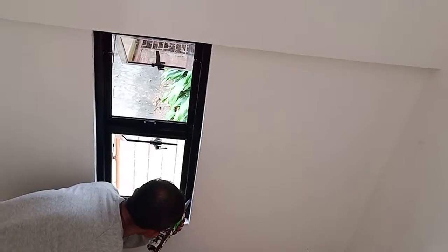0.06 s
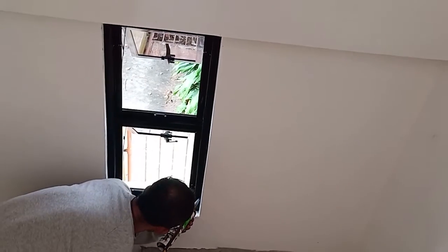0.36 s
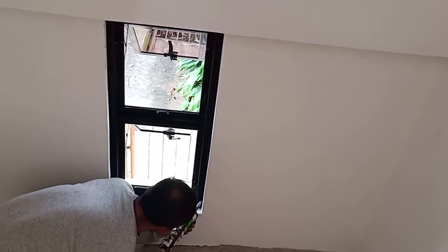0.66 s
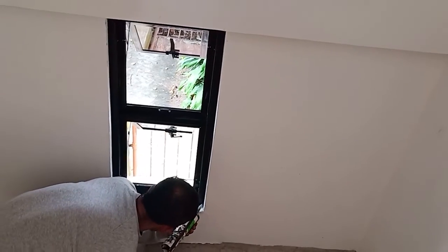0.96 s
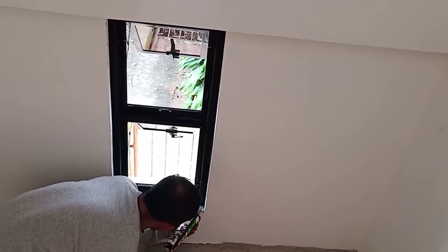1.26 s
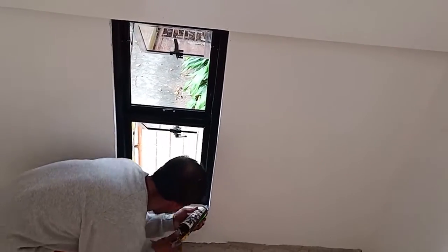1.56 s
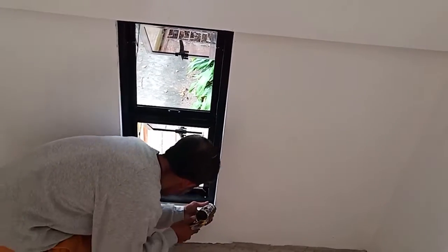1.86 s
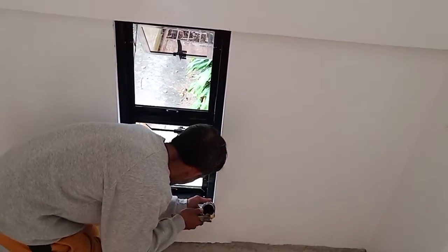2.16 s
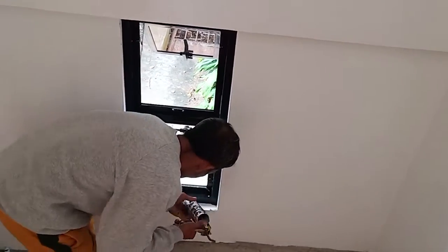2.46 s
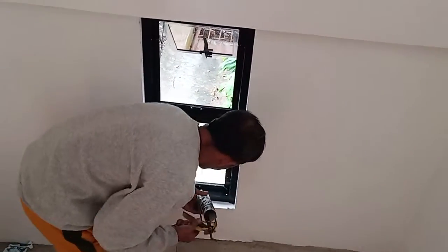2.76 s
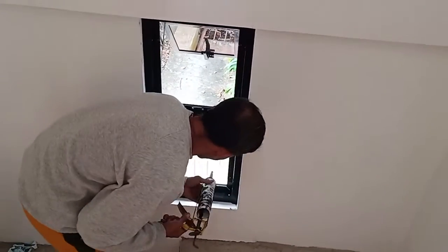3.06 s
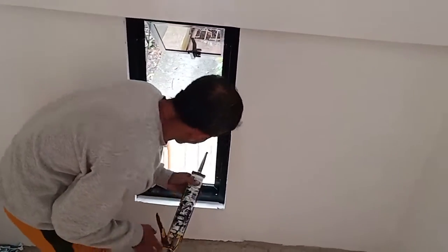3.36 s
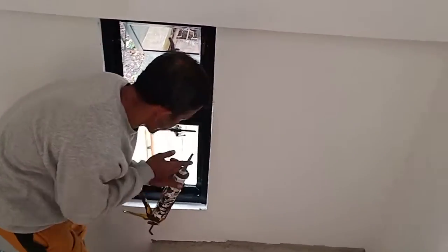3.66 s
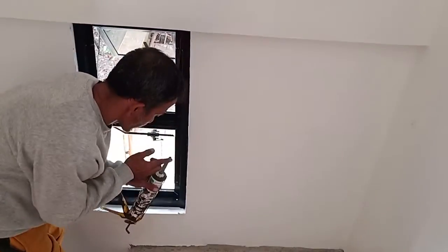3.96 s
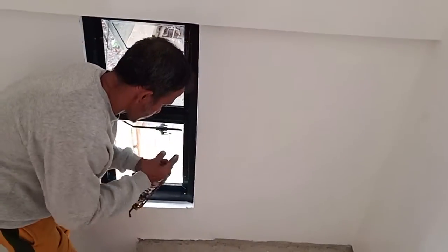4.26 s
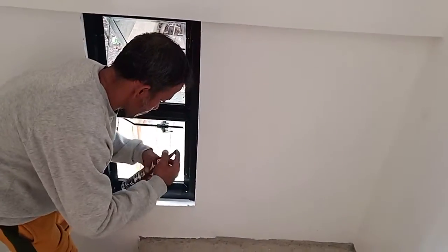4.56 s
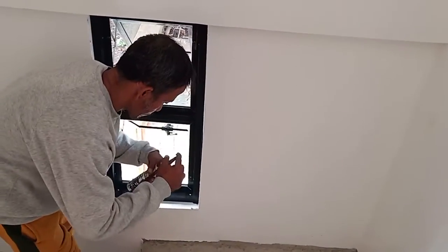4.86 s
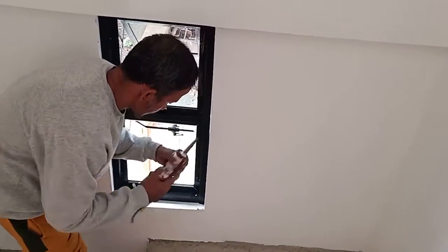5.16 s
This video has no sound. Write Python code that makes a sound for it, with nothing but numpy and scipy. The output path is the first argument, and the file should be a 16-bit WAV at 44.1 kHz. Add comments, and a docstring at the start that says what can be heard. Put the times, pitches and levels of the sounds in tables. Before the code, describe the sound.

A caulking gun's nozzle drags softly and grittily along a window frame, stopping by 0.5 seconds, over low scuffs of a shifting body. At about 0.6 seconds something heavy bangs and rattles further off, echoing through the bare room. From 1.4 to 1.8 seconds the steel gun clicks and clacks, followed by a short rod scrape and a low, wavering hoot. The window frame gives a hollow knock at 2.3 seconds, and a finger bumps the phone microphone just after. Brief scrapes and a fainter hoot begin around 2.7 seconds, then the sharpest ringing clacks come between 2.8 and 3.2 seconds. Faint, thin whistles drift through the quiet from 3.4 seconds, with a bright tick on the plastic nozzle at 4.3. At about 5 seconds heavy things clatter loudly further away, ringing in the room. The background stays very quiet.

```python
"""A gritty drag slows to a stop: a steel caulking gun's nozzle on a window frame in a bare, echoing room.
Its catch plate, trigger and plunger rod clack, ring and scrape; the frame knocks, the nozzle ticks.
Heavy bangs and a last loud clatter come from further off. Each contact is a burst of micro-slips.
A shifting body scuffs and fingers bump the phone; two wavering hoots and a few thin whistles
drift in over a very quiet floor."""
import sys
import numpy as np
from scipy import signal
from scipy.fft import rfft, irfft
from scipy.io import wavfile
from scipy.ndimage import uniform_filter1d

SR = 44100
rng = np.random.default_rng(int(sys.argv[2]) if len(sys.argv) > 2 else 0)


def int16_out(signal):
    """Quantize to a 16-bit WAV file."""
    q = np.round(np.clip(np.atleast_2d(signal).T, -1, 1) * 32767)
    wavfile.write(sys.argv[1], SR, q.astype(np.int16))


N = 230422
T = np.arange(N) / SR
HIT_SAMPLES, LEAD_SAMPLES = 8192, 256

# Noise floor spectrum. Each row: frequency in Hz, relative level in dB.
FLOOR_COLOUR = [(25, -21), (60, -5), (150, 2.5), (300, -0.5), (600, -6.5), (1200, -10), (2500, -12),
                (6000, -20.5), (15500, -24)]


def undb(db):
    """Decibels to gain."""
    return np.exp(np.asarray(db) * np.log(10) / 20)


def unit(x):
    """Scale to rms 1."""
    return x / np.sqrt(np.mean(x ** 2))


def along(points, hz):
    """Interpolate (Hz, value) points on a log-frequency axis."""
    point_hz, value = np.transpose(points)
    return np.interp(np.log(hz + 1), np.log(point_hz), value)


def bins(size):
    """Frequencies of a real spectrum in Hz."""
    return np.fft.rfftfreq(size, 1 / SR)


def noise(colour):
    """Steady coloured noise, rms 1."""
    size = 2 ** 18
    white = rfft(rng.standard_normal(size))
    return unit(irfft(white * undb(along(colour, bins(size))))[:N])


def body(colour, tilt_db_per_octave):
    """Minimum-phase response of a struck object; harder contact tilts it toward the treble."""
    hz = bins(HIT_SAMPLES)
    octaves = np.log2(np.maximum(hz, 300) / 1000)
    gain = undb(along(colour, hz) + tilt_db_per_octave * octaves)
    cepstrum = irfft(np.log(unit(gain)))
    cepstrum[1:HIT_SAMPLES // 2] *= 2
    cepstrum[HIT_SAMPLES // 2 + 1:] = 0
    return np.exp(rfft(cepstrum))


def ring(modes):
    """Summed response of damped resonances."""
    hz = bins(HIT_SAMPLES)
    return sum(undb(db) * 1j * hz * width_hz / (mode_hz ** 2 - hz ** 2 + 1j * hz * width_hz)
               for mode_hz, width_hz, db in modes)


def add_contact(track, start_s, length_s, db, response, grain_db):
    """A short run of uneven micro-slips excites a body."""
    size, grain = rng.standard_normal((2, HIT_SAMPLES))
    progress = np.maximum(np.arange(HIT_SAMPLES) - LEAD_SAMPLES, 0) / SR / max(length_s, 0.0005)
    envelope = np.sqrt(progress) * np.exp(-progress ** 4)
    slips = rfft(size * undb(grain_db * grain) * envelope)
    # whiten: all colour comes from the body
    slips /= np.sqrt(uniform_filter1d(np.abs(slips) ** 2, size=31, mode="mirror"))
    force = irfft(slips) * (progress > 0) * np.sqrt(length_s * SR)
    first = int(start_s * SR) - LEAD_SAMPLES
    track[first:first + HIT_SAMPLES] += undb(db) * irfft(rfft(force) * response)[:N - first]


def strike(contacts, colour, grain_db, modes=()):
    """A series of contacts on one object."""
    out = np.zeros(N)
    resonance = 1 + ring(modes)
    for start_s, length_s, db, tilt in contacts:
        add_contact(out, start_s, length_s, db, body(colour, tilt) * resonance, grain_db)
    return out


def tone(note, attack_s, release_s, waver, width_hz):
    """A gliding sine whose level and phase waver as its reflections mix."""
    start_s, length_s, hz, glide_hz_per_s, db, fade_db_per_s = note
    age_s = np.clip(T - start_s, 0, length_s)
    in_phase, quadrature = (waver * np.interp(age_s * width_hz, np.arange(256), knots)
                            for knots in rng.standard_normal((2, 256)))
    phase = 2 * np.pi * (hz + glide_hz_per_s * age_s / 2) * age_s
    gate = np.clip(np.minimum(age_s / attack_s, (length_s - age_s) / release_s), 0, 1)
    level = gate * undb(db - fade_db_per_s * age_s) * np.sqrt(2 / (1 + waver ** 2))
    return level * ((1 + in_phase) * np.sin(phase) + quadrature * np.cos(phase))


def room(x, direct_db, echo_db, t60_scale, build_s):
    """Direct sound plus a dense echo off plaster; the top treble dies first."""
    # Each row: band in Hz, unscaled T60 in seconds, echo level in dB.
    echo_bands = [(100, 0.79, 2.5), (256, .7, 2.5), (547, 0.99, 2), (1340, 0.96, 6), (2870, 0.92, 3.5),
                  (6300, 0.86, 3.5), (10300, 0.64, 1.5), (14630, .57, 4)]
    hz, t60_s, db = np.transpose(echo_bands)
    t = T[:49152]
    band = along(np.c_[hz, np.arange(len(hz))], bins(len(t)))
    white, tail = rfft(rng.standard_normal(len(t))), 0
    for k in range(len(hz)):
        share = np.maximum(1 - np.abs(band - k), 0)
        tail += irfft(white * share) * undb(db[k] - 60 * t / (t60_s[k] * t60_scale))
    tail *= (1 - np.exp(-t / build_s)) / np.sqrt(SR / 20)
    return undb(direct_db) * x + undb(echo_db) * signal.fftconvolve(x, tail)[:N]


def nozzle_drag():
    """The nozzle grinds along the frame to a stop; level follows a power of its speed."""
    # Each row: frequency in Hz, level in dB.
    colour = [(59, -49), (100, -21), (293, 5), (601, -3.5), (727, -10.5), (879, -3.5), (956, -21.5),
              (1060, -8.5), (1550, -10.5), (2690, -6.5), (6000, -9), (9950, -18.5), (15500, -21)]
    level_db, grit_db, stop_s = -42, 3, 0.46
    grit = undb(grit_db * np.repeat(rng.standard_normal(N // 128 + 1), 128)[:N])
    speed = np.maximum(1 - (T / stop_s) ** 2, 0)
    drag = unit(noise(colour) * grit) * undb(level_db) * speed ** 1.77
    return room(drag, direct_db=-1, echo_db=-3.5, t60_scale=1, build_s=0.0089)


def body_scuffs():
    """Low scuffs swell, hold and die away as the body shifts."""
    # Each row: start in seconds, length in seconds, level in dB.
    scuffs = [(0, 0.096, -47.5), (0.18, .11, -49.5), (0.285, 0.04, -45), (0.409, 0.08, -48.5),
              (1.676, .16, -48.5), (2.3, 0.091, -49.5), (2.505, 0.17, -55), (3.27, 0.07, -68)]
    # Each row: frequency in Hz, level in dB.
    colour = [(40, -37.5), (110, -9.5), (180, 6), (300, -0.5), (440, 1.5), (650, -13), (1500, -48)]
    attack_s, release_db_per_s = 0.026, 193.5
    effort = np.zeros(N)
    for start_s, length_s, db in scuffs:
        rise = np.clip((T - start_s) / attack_s, 0, 1)
        effort += rise * undb(db - release_db_per_s * np.maximum(T - start_s - length_s, 0))
    return noise(colour) * effort


def far_bang():
    """Something heavy bangs and rattles further off: dull, mostly echo."""
    # Each row: start in seconds, length in seconds, level in dB, tilt in dB/octave.
    contacts = [(0.552, 0.014, -35.5, -0.5), (.566, 0.014, -21.5, 0.66), (.598, 0.022, -24.5, 0.5),
                (0.649, 0.027, -30, -0.5), (0.751, 0.012, -29.5, -2.5), (0.881, 0.032, -46, -2.5)]
    # Each row: frequency in Hz, level in dB.
    colour = [(40, -45.5), (130, -19), (290, -2), (580, 4), (950, -7.5), (1200, -3.5), (1450, -12.5),
              (2300, -6), (4300, -19.5), (6700, -18.5), (10000, -34), (13000, -29.5), (16000, -30)]
    # Each row: resonance in Hz, width in Hz, gain in dB.
    modes = [(310, 22, 2.5), (541.7, 20, 3), (715, 15, -0.5), (820, 37, 3), (1235, 25, 0.5),
             (1357, 25, 2.5), (2090, 40, 1.5)]
    bang = strike(contacts, colour, grain_db=2.5, modes=modes)
    return room(bang, direct_db=-8.5, echo_db=-5, t60_scale=0.85, build_s=0.002)


def frame_knocks():
    """Dull, hollow contacts with the window frame."""
    # Each row: start in seconds, length in seconds, level in dB, tilt in dB/octave.
    contacts = [(1.030, 0.06, -57, -8), (2.294, 0.019, -34.5, -0.5), (2.335, 0.028, -48, 3),
                (3.288, 0.032, -55.5, -2), (3.621, 0.029, -55, 4)]
    # Each row: frequency in Hz, level in dB.
    colour = [(60, -23), (170, -3), (500, 1), (1100, -6.5), (2600, -0.5), (5000, -11), (9000, -14),
              (15000, -23.5)]
    # Each row: resonance in Hz, width in Hz, gain in dB.
    modes = [(380, 16, 3.5), (525, 37, 15.5), (572, 18, 12.5), (846, 43, 10.5)]
    knocks = strike(contacts, colour, grain_db=6, modes=modes)
    return room(knocks, direct_db=-10, echo_db=-2.5, t60_scale=0.68, build_s=0.00087)


def whistles():
    """Thin, fluttering squeaks and whistles drift in and echo."""
    # Each row: start and length in seconds, pitch in Hz, glide in Hz/s, level in dB, fade in dB/s.
    notes = [(1.404, 0.051, 1880, 0, -59.5, 22), (3.44, 0.57, 1172, -170, -62.5, 22.5),
             (3.615, 0.081, 610, 154, -59, 15), (3.999, 0.18, 760, 256, -76, 15),
             (4.28, 0.19, 1631, 0, -74, 35), (4.408, 0.26, 4670, -1000, -69, 8),
             (4.657, 0.341, 613, 58, -78.5, -44), (4.72, 0.2, 7020, -6500, -76.5, 35)]
    thin = sum(tone(note, attack_s=0.019, release_s=0.035, waver=3.1, width_hz=note[2] / 15)
               for note in notes)
    return room(thin, direct_db=0.5, echo_db=-6, t60_scale=0.64, build_s=0.0025)


def gun_clacks():
    """The catch plate chatters on the rod; each kind of blow rings the parts in its own proportions."""
    # Each row: start in seconds, length in seconds, level in dB, tilt in dB/octave, kind of blow.
    clacks = [(1.443, 0.011, -42.5, -1.5, "catch"), (1.451, 0.0044, -35, -1, "catch"),
              (1.547, 0.013, -49, -4.5, "slide"), (1.625, 0.14, -46, -3, "slide"),
              (1.655, 0.0088, -22.5, 3.5, "seat"), (1.665, 0.013, -16, 2, "seat"),
              (1.744, 0.054, -34, -0.5, "seat"), (2.831, 0.015, -14.5, 3.5, "squeeze"),
              (2.843, 0.0055, -15, 3.5, "squeeze"), (2.854, .003, -18.5, 5.5, "squeeze"),
              (2.942, 0.016, -26, -0.5, "squeeze"), (3.02, 0.016, -19.5, 3.5, "release"),
              (3.029, 0.0068, -10.5, 5, "release"), (3.111, 0.013, -25.5, 0.5, "release"),
              (3.142, 0.0086, -25, 0, "release"), (3.343, 0.016, -40, -1, "release"),
              (3.561, 0.054, -55.5, -2.5, "release")]
    # Steel on steel. Each row: frequency in Hz, level in dB.
    colour = [(60, -39), (150, -25.5), (400, -19.5), (850, -19), (1300, -13), (2400, -3.5), (4500, -2.5),
              (6000, 2.5), (8500, -2.5), (11000, 0), (14000, 0.5), (16000, -3.5)]
    # Ringing parts. Each row: resonance in Hz, width in Hz, gain in dB.
    catch_plate = [(1970, 200, -9), (2490, 140, -2), (3500, 200, 4), (4320, 260, -5.5), (5440, 200, -1),
                   (6270, 220, 1.5), (6650, 250, 2.5)]
    trigger = [(2890, 59, 3), (3018, 430, 5), (3405, 50, 0), (3960, 75, -3)]
    rod = [(5530, 76, -8), (6100, 110, -4), (6630, 150, -0.5), (6840, 240, 3.5), (6830, 150, -5.5)]
    gun_frame = [(1230, 70, 7.5), (1370, 31, -1.5), (2000, 190, -6), (2450, 140, 0.5), (2670, 80, 3),
                 (2820, 40, -0.5), (4288, 160, -3.5), (5900, 120, -5)]
    cartridge = [(110, 54, 20), (190, 80, -0.5), (454.8, 150, 17.5), (708, 50, 7), (990, 400, -6)]
    cradle = [(2216, 30, 0.5), (3300, 15, 0.5), (4740, 27, 4.5), (7300, 35, 0), (8370, 70, 1),
              (9500, 40, -1), (9700, 70, 0), (11750, 90, 0.5), (13600, 70, 0.5), (14600, 70, 1),
              (15200, 110, -1)]
    # Each kind of blow: gains in dB of catch plate, trigger, rod, gun frame, cartridge.
    part_gains_db = {"catch": (16, 2, -1, 0, -36.5), "slide": (-7, -11.5, -12, 15, -13.5),
                     "seat": (-15.5, -30.5, -8, -8, 4), "squeeze": (-15, -6, 2.5, -8.5, -4.5),
                     "release": (-22.5, 4.5, 3.5, -18, -7)}
    parts = [ring(modes) for modes in (catch_plate, trigger, rod, gun_frame, cartridge)]
    cradle_ring = undb(-1.5) * ring(cradle)  # same for every blow
    out = np.zeros(N)
    for start_s, length_s, db, tilt, blow in clacks:
        parts_ring = sum(undb(gain_db) * part for gain_db, part in zip(part_gains_db[blow], parts))
        response = body(colour, tilt) * (1 + cradle_ring + parts_ring)
        add_contact(out, start_s, length_s, db, response, grain_db=-1.5)
    return room(out, direct_db=-3.5, echo_db=-4, t60_scale=0.96, build_s=0.0065)


def rod_rasps():
    """The plunger rod scrapes briefly through its guide."""
    # Each row: start in seconds, length in seconds, level in dB, tilt in dB/octave.
    contacts = [(1.535, 0.034, -51, -0.5), (1.920, 0.024, -39.5, -0.5), (2.650, .07, -48.5, 2),
                (2.725, 0.034, -51, 3.5)]
    # Each row: frequency in Hz, level in dB.
    colour = [(100, -34.5), (1000, -23), (1500, -9.5), (2200, 0.5), (3300, -1), (4500, -8), (7000, -15.5),
              (15000, -31)]
    rasps = strike(contacts, colour, grain_db=1.5)
    return room(rasps, direct_db=-1, echo_db=-4, t60_scale=0.7, build_s=0.0062)


def hoots():
    """Two low hoots waver and fade."""
    # Each row: start and length in seconds, pitch in Hz, glide in Hz/s, level in dB, fade in dB/s.
    notes = [(1.763, 0.52, 460, -59, -33, 67.5), (2.705, 0.59, 457.7, -5.5, -47, 12.5)]
    return sum(tone(note, attack_s=0.014, release_s=0.033, waver=0.93, width_hz=41) for note in notes)


def phone_bumps():
    """Finger thuds reach the microphone through the phone's case, with no echo."""
    # Each row: start in seconds, length in seconds, level in dB, tilt in dB/octave.
    contacts = [(2.43, 0.0016, -32, 0), (2.4363, 0.0016, -19.5, -1.5), (2.594, 0.026, -46.5, -2.5),
                (2.629, 0.013, -54, 0), (2.942, 0.0064, -26, 0), (3.79, 0.01, -59, -7)]
    # Each row: frequency in Hz, level in dB.
    colour = [(25, -14.5), (90, 2), (300, 3.5), (700, -3), (1500, -11), (3500, -5), (8000, -15.5),
              (16000, -7)]
    return strike(contacts, colour, grain_db=-2)


def nozzle_ticks():
    """A fingernail ticks brightly on the plastic nozzle."""
    # Each row: start in seconds, length in seconds, level in dB, tilt in dB/octave.
    contacts = [(4.188, 0.045, -64.5, -7), (4.284, 0.0046, -35.5, 19), (4.287, 0.0058, -36, 14),
                (4.572, .006, -51, -0.5)]
    # Each row: frequency in Hz, level in dB.
    colour = [(100, -36.5), (2000, -33), (4800, -10), (6200, 1.5), (10000, -3.5), (13500, 4), (16000, -7)]
    ticks = strike(contacts, colour, grain_db=-5)
    return room(ticks, direct_db=-4, echo_db=-0.5, t60_scale=0.46, build_s=0.0045)


def far_clatter():
    """Heavy things knocked about further off ring loudly."""
    # Each row: start in seconds, length in seconds, level in dB, tilt in dB/octave.
    contacts = [(4.977, 0.0074, -29, -1.5), (4.985, 0.013, -17.5, -1.47), (5.005, 0.012, -13.5, 2.5),
                (5.045, 0.021, -19.5, 1), (5.115, 0.023, -20.5, -0.2), (5.175, 0.065, -24, -0.1)]
    # Each row: frequency in Hz, level in dB.
    colour = [(30, -30), (80, -9.5), (160, -2.5), (300, -1), (600, 1.5), (950, -3.5), (1400, -3.5),
              (2600, -0.5), (4300, -8), (6700, -6.5), (9000, -16.5), (13000, -19.5), (16000, -18)]
    # Each row: resonance in Hz, width in Hz, gain in dB.
    modes = [(315, 30, 8.5), (400, 43, 1.5), (712, 46, 3), (790, 22, 4), (1076, 38, -1.5),
             (1220, 110, -1.5), (1370, 63, 0.5), (1680, 47, 1), (1770, 40, -17), (2083, 16, 4),
             (2710, 110, -7)]
    clatter = strike(contacts, colour, grain_db=-0.5, modes=modes)
    return room(clatter, direct_db=-3.5, echo_db=-2.5, t60_scale=1, build_s=0.011)


def suppress(x, threshold_db, depth_db, knee_db):
    """Noise suppressor: turns down bands that sink toward the floor, shortening the tails."""
    hz, _, cells = signal.stft(x, SR, nperseg=512)
    power = uniform_filter1d(np.abs(cells) ** 2, size=5, axis=-2)  # across frequency
    power = uniform_filter1d(power, size=5, axis=-1)  # across time
    over_db = 10 * np.log10(np.abs(power) + 1e-18) - along(FLOOR_COLOUR, hz)[:, None] - threshold_db
    shut = (1 - np.tanh(over_db / knee_db)) / 2
    return signal.istft(cells * undb(depth_db * shut), SR, nperseg=512)[1][:, :N]


def scene():
    """All sources at one microphone position."""
    contacts = gun_clacks() + rod_rasps() + nozzle_ticks() + frame_knocks()
    contacts += far_bang() + far_clatter() + phone_bumps()
    rubbing = nozzle_drag() + body_scuffs()
    background = hoots() + whistles() + noise(FLOOR_COLOUR) * undb(-66.5)
    mono = contacts + rubbing + background
    return np.array([mono, mono])


def record(dry):
    """The phone's one microphone: bass roll-off, noise suppression, steep treble cut."""
    low_hz, top_hz = 55, 15650
    thin = signal.sosfilt(signal.butter(2, low_hz, "high", fs=SR, output="sos"), dry[:1])
    quiet = suppress(thin, threshold_db=-65, depth_db=-7.5, knee_db=6)
    cut = signal.sosfilt(signal.ellip(10, 0.2, 70, top_hz, fs=SR, output="sos"), quiet)
    return np.vstack([cut, cut])


dry = scene()
out = record(dry)
int16_out(out)
```